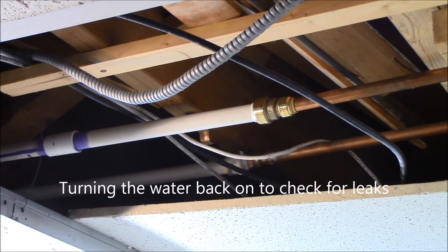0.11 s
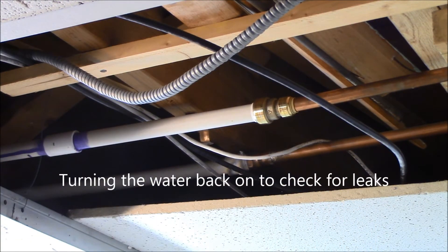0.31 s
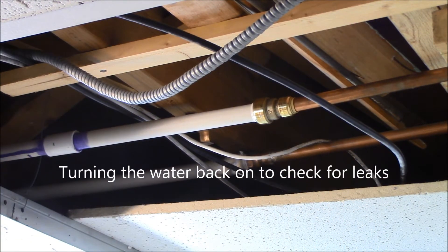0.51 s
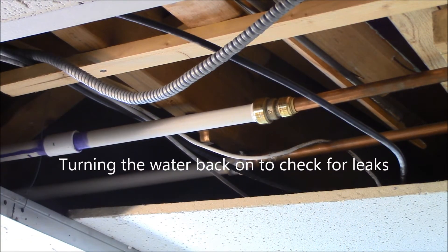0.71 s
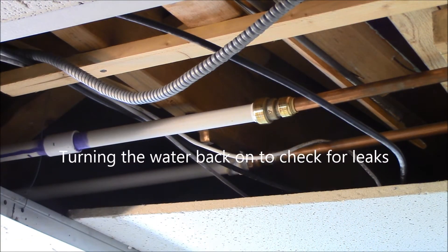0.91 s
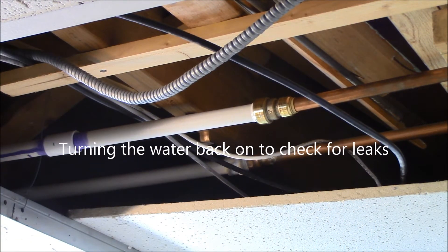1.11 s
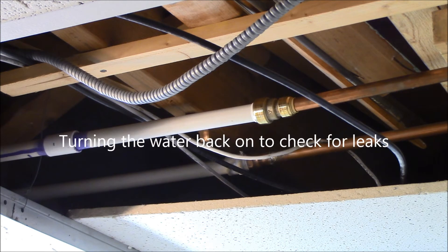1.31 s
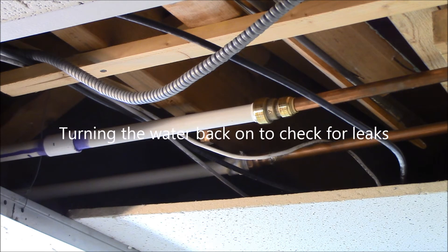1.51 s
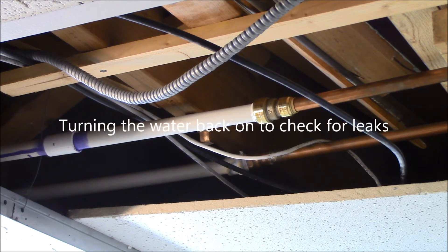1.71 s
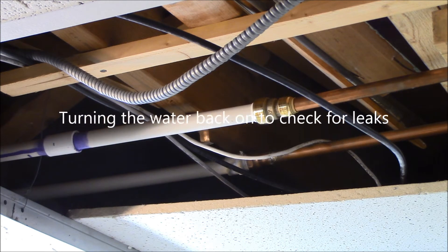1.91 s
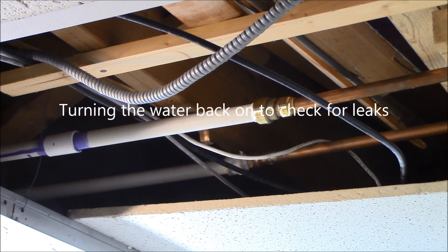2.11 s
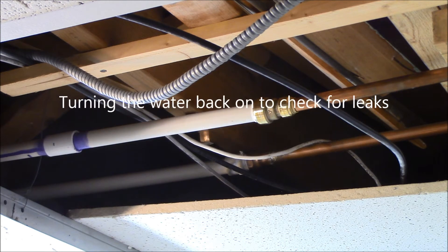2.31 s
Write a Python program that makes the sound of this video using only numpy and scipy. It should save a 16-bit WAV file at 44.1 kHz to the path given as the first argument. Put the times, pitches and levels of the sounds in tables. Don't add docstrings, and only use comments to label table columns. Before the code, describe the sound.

A filling water pipe knocks and spits, hardest around one second, then eases into sparse wet spurts; faint flow, ringing pipe tones and distant hum beneath, in a small room heard through a thin stereo microphone.

```python
import sys
import numpy as np
from scipy import signal
from scipy.io import wavfile

SR = 44100
rng = np.random.default_rng(int(sys.argv[2]) if len(sys.argv) > 2 else 0)


def to_wav(sig):
    pcm = np.clip(np.atleast_2d(sig), -1, 1) * 32767
    pcm = np.round(pcm).astype(np.int16)
    wavfile.write(sys.argv[1], SR, pcm.T)


def gain_from_db(level_db):
    decades = np.asarray(level_db, float) / 20
    return 10 ** decades


N = 105840


def rms_one(x):
    return x / np.sqrt(np.mean(x ** 2) + 1e-20)


def peak_one(x):
    return x / np.max(np.abs(x))


def at_hz(points, hz):
    table = np.array(points)
    return np.interp(np.log(hz), np.log(table[:, 0]), table[:, 1])


def band(x, low_hz, high_hz):
    edges = [low_hz, min(high_hz, SR * .45)]
    return signal.sosfilt(signal.butter(2, edges, "band", fs=SR, output="sos"), x)


def high_pass(x, order, hz):
    return signal.sosfilt(signal.butter(order, hz, "high", fs=SR, output="sos"), x)


def drift(rate_hz):
    r = np.exp(-80 * np.pi * rate_hz / SR)
    steps = rng.standard_normal(N // 40 + 2002)
    slow = signal.lfilter([1], [1, -2 * r, r * r], steps)[2000:]
    return np.interp(np.arange(N) / 40, np.arange(len(slow)), rms_one(slow))


def ring(x, hz, t60_s):
    r = gain_from_db(-60 / (t60_s * SR))
    w = 2 * np.pi * hz / SR
    gain = 2 * np.sqrt(1 - r) * np.sqrt(2) * np.sin(w)
    return signal.lfilter([0, gain], [1, -2 * r * np.cos(w), r * r], x + 1e-18)


# pitch_hz, likeness (0-1)
LEFT_RIGHT_LIKENESS = [(250, 0.86), (1000, 0.91), (4000, 0.67), (12000, 0.79)]


def spread(pair, hz):
    alike = np.clip(at_hz(LEFT_RIGHT_LIKENESS, hz), 0, 1)
    mid = np.sqrt(1 + alike) * pair[0]
    side = np.sqrt(1 - alike) * pair[1] * [[1], [-1]]
    return (mid + side) / np.sqrt(2)


def banded_noise(spectrum, patchy_db):
    out, together = 0, drift(3.0)
    white = rng.standard_normal((2, 2, N))
    for k, low_hz in enumerate(20 * 2 ** np.arange(3, 9.8, 1 / 4)):
        hz = low_hz * 2 ** .125
        outside = hz < spectrum[0][0] * .8 or hz > spectrum[-1][0] * 1.2
        flicker_db = patchy_db * (.5 * together + drift(15))
        gain = gain_from_db(at_hz(spectrum, hz) - 40 * outside + flicker_db)
        out = out + gain * spread(band(white[k % 2], low_hz, low_hz * 2 ** .25), hz)
    return rms_one(out)


# pitch_hz, level_db (rms)
MACHINE_HUM = [(212, -74), (236, -73), (424, -76), (469, -70), (848, -68.5), (1408, -67)]
WHINE_HZ, WHINE_DB = 14550, -82
HUM_WAVER_DB = 1.5


def machine_hum():
    t, out = np.arange(N) / SR, 0
    for hz, db in list(MACHINE_HUM) + [(WHINE_HZ, WHINE_DB)]:
        level = gain_from_db(db + HUM_WAVER_DB * drift(5.4)) * np.sqrt(2)
        out = out + level * np.sin(2 * np.pi * (hz * t + rng.random()))
    return out


# pitch_hz, level_db (per Hz)
FLOW_COLOUR = [(250, -31), (400, -2.5), (560, -8.5), (790, 2), (960, 0), (1150, -24), (1600, 1),
               (5000, -13.5)]
FLOW_DB, FLOW_PATCHY_DB = -57.5, 1.0


def steady_flow():
    return gain_from_db(FLOW_DB) * banded_noise(FLOW_COLOUR, FLOW_PATCHY_DB)


# pitch_hz, width_hz, level_db
PIPE_SONG = [(572.3, 9, -71.5), (770, 55, -77), (852, 4.7, -72), (1085, 88, -68), (1157, 75, -70),
             (1555, 15, -76), (1903, 10, -92.5), (7890, 52, -81.5)]


def pipe_song():
    white, out = rng.standard_normal((2, N + SR)), 0
    for hz, width_hz, db in PIPE_SONG:
        tone = ring(white, hz, 2.2 / width_hz)[:, SR:]
        out = out + gain_from_db(db) * spread(tone, hz)
    return out


# time_s, level_db
HISS_FADE = [(0, -58), (.24, -57), (.6, -62), (1.0, -62.5), (1.4, -61.5), (1.9, -62.5), (2.4, -64.5)]
# pitch_hz, level_db (per Hz)
HISS_COLOUR = [(2500, -3), (4000, 0), (7000, -3), (10000, -6), (14000, -7), (16500, -9)]
HISS_PATCHY_DB = .6


def valve_hiss():
    level_db = np.interp(np.arange(N) / SR, *np.transpose(HISS_FADE))
    return gain_from_db(level_db) * banded_noise(HISS_COLOUR, HISS_PATCHY_DB)


# start_s, length_s, pitch_hz, level_db
VALVE_SQUEAKS = [
    (0.07, 0.069, 6500, -65),
    (.165, 0.029, 5800, -59.5),
    (0.14, 0.12, 2100, -59),
]


def valve_squeaks():
    t, white, out = np.arange(N) / SR, rng.standard_normal(N), 0
    for start_s, length_s, hz, db in VALVE_SQUEAKS:
        swell = np.sin(np.pi * np.clip((t - start_s) / length_s, 0, 1))
        out = out + gain_from_db(db) * swell * ring(white, hz, 0.016)
    return out


# centre_s, level_db, pitch_hz
AIR_GULPS = [
    (0.176, -52, 370),
    (.35, -57.5, 379),
    (1.841, -56, 412),
]
GULP_S = .02


def air_gulps():
    t, out = np.arange(N) / SR, 0
    for centre_s, db, hz in AIR_GULPS:
        swell = np.exp(-((t - centre_s) / GULP_S * 2) ** 2)
        out = out + gain_from_db(db) * swell * np.sin(2 * np.pi * hz * t)
    return out


# pitch_hz, level_db, t60_s
WALL_MODES = [(770, -3, .05), (900, -5, .04), (1170, -3, .04), (1350, -3, .04), (1610, -1, .05),
              (1775, -2, .045), (1875, -4, .04), (2080, -3, .04), (2340, -1, .045), (2650, -2, .035),
              (2900, -3, .03), (3080, -4, .03), (3330, -2, .03), (5140, -2, .015)]
WALL_DB, BODY_DB, SPRAY_DB = -5, -9, -8
FOCUS_DB_PER_OCT, SCATTER_DB = 20.0, 2.0
WALL_FLOOR_OCT, BODY_WIDTH_OCT = .9, .55
GRIT_DB, STRIKE_DB, STRIKE_S = 3.0, 11.5, 0.00065
FALL_T60_S, SPRAY_T60_S = 0.035, 0.049
SPRAY_LOW_HZ, SPRAY_HIGH_HZ, SPRAY_LIKENESS = 2960, 4810, 0.98
SPAN = 6000


def wall_ring(push, centre_hz):
    out = 0
    for hz, mode_db, t60_s in WALL_MODES:
        level_db = mode_db + SCATTER_DB * rng.standard_normal()
        level_db -= FOCUS_DB_PER_OCT * abs(np.log2(hz / centre_hz))
        out = out + gain_from_db(level_db) * peak_one(ring(push, hz, t60_s))
    return high_pass(out, 3, centre_hz / 2 ** WALL_FLOOR_OCT)


def water_spray(envelope):
    mid, side = signal.lfilter(*signal.butter(1, SPRAY_HIGH_HZ, fs=SR),
                               high_pass(envelope * rng.standard_normal((2, SPAN)), 2, SPRAY_LOW_HZ))
    return np.sqrt(1 + SPRAY_LIKENESS) * mid + np.sqrt(1 - SPRAY_LIKENESS) * side * [[1], [-1]]


def slugs(rows, rise_s):
    out, t = np.zeros((2, N + SPAN)), np.arange(SPAN) / SR
    rise = np.sin(np.pi / 2 * np.minimum(t / rise_s, 1)) ** 2
    for start_s, db, hz, spray_db, length_s in rows:
        grit = np.minimum(rng.exponential(1, SPAN // 20), 3)
        rough = gain_from_db(GRIT_DB * grit).repeat(20)
        late_s = np.maximum(t - length_s, 0)
        push = rise * rough * gain_from_db(STRIKE_DB * np.exp(-t / STRIKE_S) - 60 * late_s / FALL_T60_S)
        wall = wall_ring(push * rng.standard_normal(SPAN), hz)
        edges = hz / 2 ** BODY_WIDTH_OCT, hz * 2 ** BODY_WIDTH_OCT
        splash = band(push * rng.standard_normal(SPAN), *edges)
        body = peak_one(band(splash, *edges))
        mist = rise * np.sqrt(rough / rough.mean())
        spray = water_spray(mist * gain_from_db(spray_db + 11.5 - 60 * late_s / SPRAY_T60_S))
        i = int(start_s * SR)
        out[:, i:i + SPAN] += gain_from_db(db) * (gain_from_db(WALL_DB) * wall + gain_from_db(BODY_DB) * body + gain_from_db(SPRAY_DB) * spray)
    return out[:, :N]


# start_s, level_db, centre_hz, spray_db, length_s
SOFT_SPURTS = [(.12, -45.5, 2330, -21, 0.038), (.165, -43, 1990, -15.5, 0.11),
               (.78, -36, 1940, -8.5, 0.017), (.805, -41, 1470, -13, 0.0083), (.966, -48, 820, -6, 0.019),
               (1.075, -42.5, 1890, -15, 0.032), (1.29, -44, 1370, -18, 0.03),
               (1.335, -41.5, 2050, -36, 0.025), (1.57, -47, 1410, -22, 0.025),
               (1.78, -36.5, 2060, -11, 0.0075), (1.787, -35, 1660, -9, 0.03),
               (1.811, -33, 1170, -12, 0.0098), (1.826, -33.5, 1300, -13, 0.012),
               (2.3, -49.5, 1240, -12, 0.029)]


def soft_spurts():
    return slugs(SOFT_SPURTS, rise_s=.006)


# start_s, peak_db, centre_hz, spray_db, length_s
SHARP_KNOCKS = [(.2185, -23.5, 2480, -13, 0.0039), (.2455, -36, 1300, -9, 0.004),
                (.4148, -26.5, 2750, -9.5, 0.0016), (.432, -36.5, 1630, -10.5, 0.0098),
                (.5655, -34, 1960, -18.5, 0.0069), (.583, -26, 2720, -4, 0.0047),
                (.589, -27, 1600, -11, 0.0045), (.7272, -24.5, 2930, -51, 0.01),
                (.7315, -32, 2030, -6.5, 0.001), (.7325, -37, 2940, -41, 0.0013),
                (.743, -35, 945, -11.5, 0.015), (.9138, -17, 3560, -18.5, 0.0044),
                (.918, -29, 2530, -14, 0.012), (.9265, -18, 2170, -38, 0.0027),
                (.931, -27, 1940, -11.5, 0.0017), (.94, -34.5, 1900, -9, 0.0016),
                (.9755, -28, 2210, -22, 0.0013), (.981, -32, 1260, -39, 0.0058),
                (1.0545, -19.5, 2660, -20.5, 0.0016), (1.058, -26.5, 1750, -20, 0.012),
                (1.263, -30, 2240, -18.5, 0.012), (1.416, -32.5, 2480, -21, 0.006),
                (1.424, -36, 1270, -19.5, 0.013), (1.693, -36.5, 1900, -15, .004)]
# start_s, peak_db, centre_hz, spray_db, length_s
SIDE_RATTLES = [
    (0.217, -31.5, 1220, -28, 0.0081),
    (0.2207, -23, 4630, -26, 0.0031),
    (.4152, -28, 6500, -16, 0.0043),
    (.5835, -31, 6800, -18, .006),
    (0.727, -33.5, 4870, -33, .008),
    (0.92, -30.5, 770, -26, 0.0073),
    (1.0583, -27.5, 5130, -22, 0.0038),
    (1.264, -36, 4600, -21, 0.0069),
]


def sharp_knocks():
    return slugs(SHARP_KNOCKS + SIDE_RATTLES, rise_s=0.00014)


ROOM_T60_S, ROOM_DB, WALL_CUT_HZ = 0.17, -26, 13500


def basement(x):
    out, dull = np.zeros((2, N)), np.exp(-2 * np.pi * WALL_CUT_HZ / SR)
    for k, lag in enumerate((rng.uniform(.006, .025, 16) * SR).astype(int)):
        loop, state = x.copy(), [0.]
        gain = gain_from_db(-60 * lag / SR / ROOM_T60_S)
        for i in range(lag, N, lag):
            back, state = signal.lfilter([gain * (1 - dull)], [1, -dull], loop[i - lag:i], zi=state)
            loop[i:i + lag] += back[:N - i]
        out[k % 2] += (loop - x) * (-1) ** (k // 2)
    return out


def scene():
    background = machine_hum() + steady_flow() + pipe_song() + valve_hiss()
    pipe = valve_squeaks() + air_gulps() + soft_spurts() + sharp_knocks()
    return background + pipe + gain_from_db(ROOM_DB) * basement(pipe.mean(axis=0))


def roll_off(x):
    return signal.sosfilt(signal.butter(12, 16490, fs=SR, output="sos"), x)


MIC_CUT_HZ, TOP_CUT_HZ = 365, 16150
RUMBLE_DB, RUMBLE_TOP_HZ = -83, 276


def record(dry):
    thin = high_pass(dry, 4, MIC_CUT_HZ)
    rumble = gain_from_db(RUMBLE_DB) * rms_one(band(rng.standard_normal((2, N)), 12, RUMBLE_TOP_HZ))
    top_cut = signal.cheby2(20, 45, TOP_CUT_HZ, fs=SR, output="sos")
    return roll_off(signal.sosfilt(top_cut, thin + rumble))


dry = scene()
out = record(dry)
to_wav(out)
```